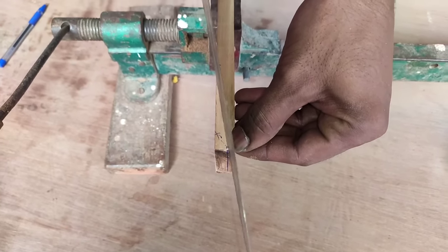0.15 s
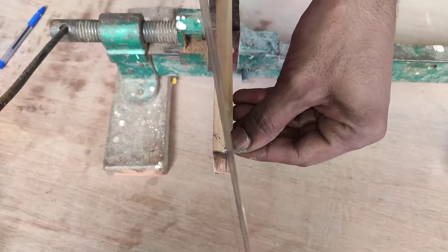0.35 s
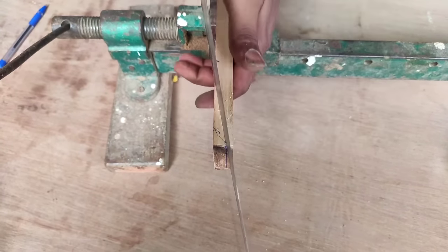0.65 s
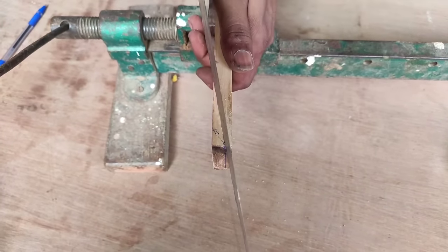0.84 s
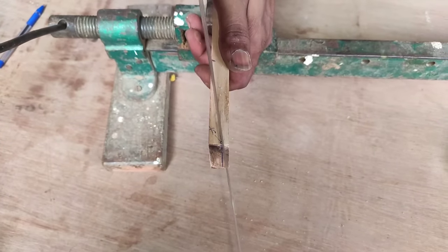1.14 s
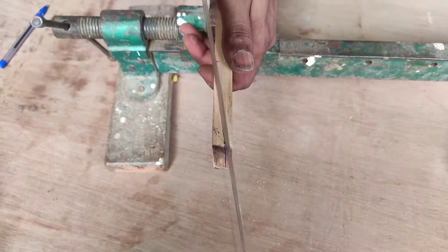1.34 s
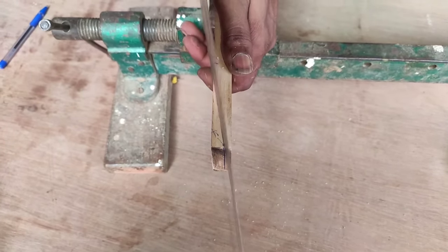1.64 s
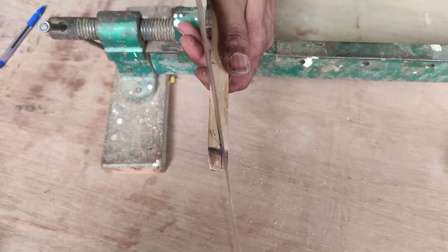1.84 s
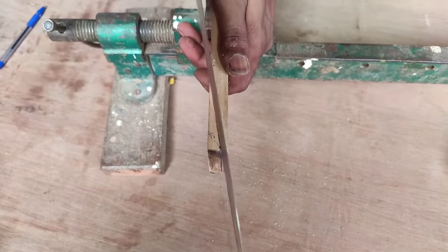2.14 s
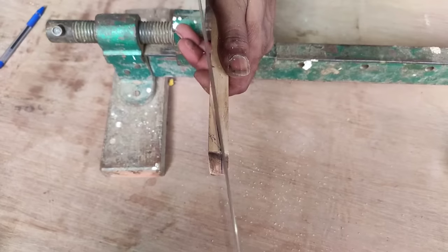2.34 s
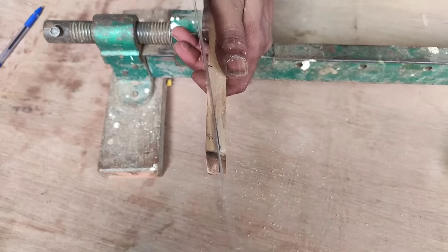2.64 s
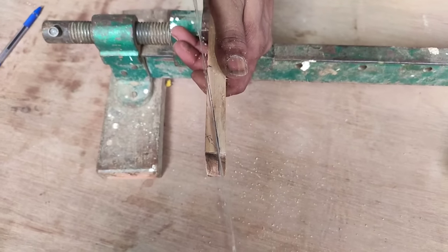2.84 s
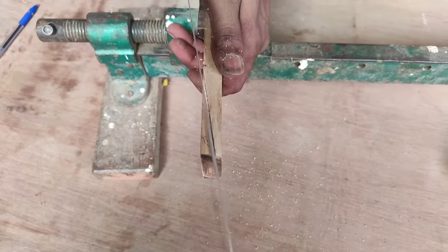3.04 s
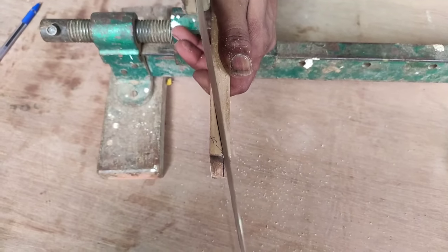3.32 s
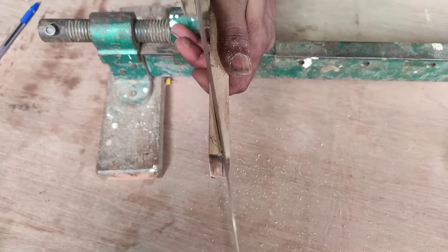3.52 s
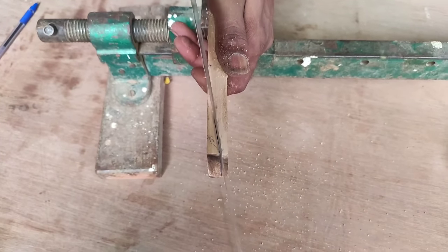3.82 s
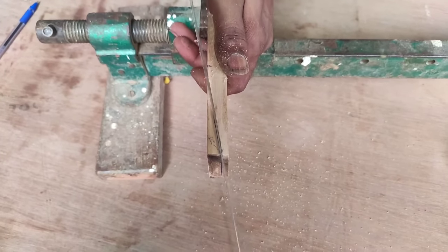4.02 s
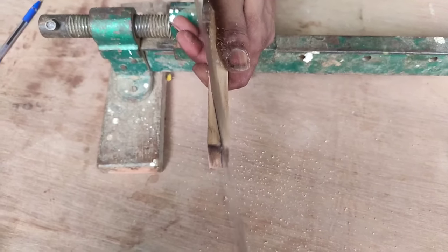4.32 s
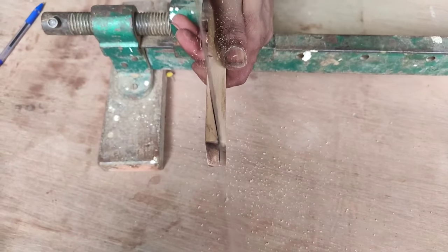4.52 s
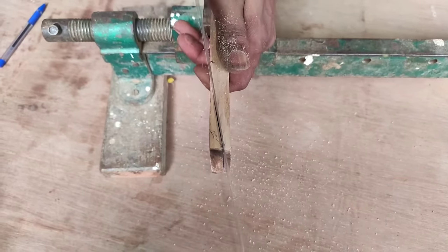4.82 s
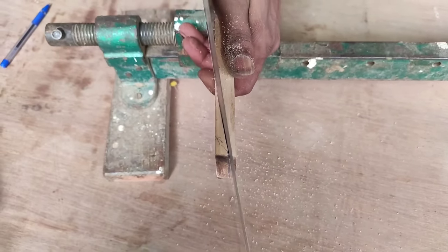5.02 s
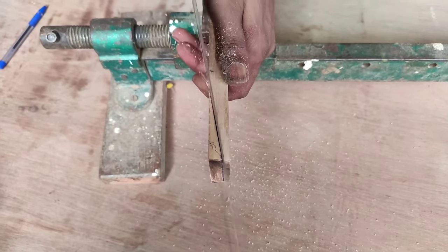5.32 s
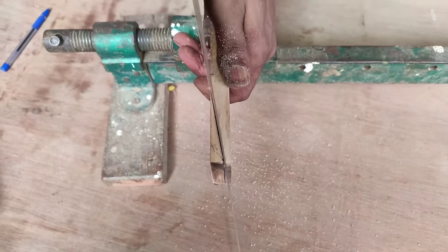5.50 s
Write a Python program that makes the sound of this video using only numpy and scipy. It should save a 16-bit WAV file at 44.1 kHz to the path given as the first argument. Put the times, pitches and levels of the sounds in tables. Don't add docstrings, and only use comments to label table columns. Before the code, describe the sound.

Light sawing on a thin wood slat, a short pause, then rapid raspy back-and-forth cutting, growing rougher with one heavy dull thump late.

```python
import sys
import numpy as np
from scipy import signal
from scipy.fft import rfft, irfft
from scipy.io import wavfile
from scipy.ndimage import uniform_filter1d

SR = 44100
rng = np.random.default_rng(int(sys.argv[2]) if len(sys.argv) > 2 else 0)


def store_wav(level_fs):
    pcm = np.round(np.clip(np.atleast_2d(level_fs), -1, 1) * 32767)
    wavfile.write(sys.argv[1], SR, pcm.T.astype(np.int16))


def level_to_linear(level):
    exponent = np.asarray(level, float) / 20
    return 10 ** exponent


N = 249606
TIME = np.arange(N) / SR

# centre_hz, width_hz, level_db
BENCH_MODES = [(63, 31, -12), (108, 34, -9), (140, 36, -1), (185, 40.9, 1), (250.6, 37.8, -2),
               (286.2, 42.6, -3), (344.3, 72.6, -9.5), (589, 73, -18.5), (756, 134, -27)]


def noise(channels):
    return rng.standard_normal((channels, N))


def unit(x):
    return x / np.sqrt(np.mean(x ** 2))


def colour(x, hz, db):
    bins = np.log(np.arange(N // 2 + 1) * SR / N + 1)
    gain = level_to_linear(np.interp(bins, np.log(hz), db))
    return irfft(rfft(x) * gain, N)


def ring(x, modes):
    out = 0
    for k, (centre_hz, width_hz, level_db) in enumerate(modes):
        b, a = signal.iirpeak(centre_hz, centre_hz / width_hz, SR)
        out = out + (-1) ** k * level_to_linear(level_db) * signal.lfilter(b, a, x)
    return out


def wander(rate_hz, channels):
    k = int(SR / rate_hz)
    held = np.repeat(rng.standard_normal((channels, N // k + 1)), k, axis=1)[:, :N]
    return unit(uniform_filter1d(uniform_filter1d(held, k), k))


def add(out, start_s, burst):
    i = int(start_s * SR)
    out[..., i:i + burst.shape[-1]] += burst[..., :N - i]


def struck(hz, t60_ms):
    t = TIME[:SR // 5]
    return np.sin(2 * np.pi * hz * t) * level_to_linear(-60 * t / (t60_ms / 1000))


def apart(x, own, share, lag):
    share = np.clip(share, 0, 1)
    return np.sqrt(1 - share) * np.array([np.roll(x, lag), x]) + np.sqrt(share) * own


def effort(part, edge_db, flat, wider):
    # full_speed_s, rise_ms, fall_ms, tear_db, bench_db, slat_db
    stroke_table = [(0.016, 10.8, 29, -55.5, -41, -69), (0.113, 34.3, 32, -49.5, -40, -68),
                    (0.22, 34, 35.2, -52, -38, -64), (0.313, 34, 40.8, -47.5, -39.5, -62),
                    (0.425, 36.3, 33.7, -49, -36.5, -65), (0.536, 53, 34, -43, -37, -67),
                    (1.137, 41.5, 33, -45, -32.5, -57.5), (1.245, 28.3, 29, -45.5, -34.5, -56),
                    (1.345, 41.2, 47, -42, -31.5, -49.5), (1.425, 20, 50, -38, -29, -45),
                    (1.536, 36.6, 24.9, -36.5, -28.5, -39), (1.636, 37, 33, -41.5, -31.5, -50),
                    (1.726, 31, 32, -34.5, -30, -40.5), (1.827, 34.1, 34.6, -38.5, -33.5, -46),
                    (1.917, 29.5, 28.8, -35.5, -30.5, -43), (2.018, 29.8, 35.7, -38, -31, -44),
                    (2.11, 33.3, 26, -32, -26, -40), (2.211, 35.2, 36.9, -40, -32.5, -46.5),
                    (2.308, 36.4, 26.9, -31.5, -25, -38), (2.405, 27.3, 34.8, -37, -32.5, -40.5),
                    (2.493, 29.2, 30, -33.5, -35, -41.5), (2.602, 26.7, 33, -38, -37, -45),
                    (2.687, 29.1, 29.9, -34, -35.5, -41), (2.792, 29, 29.5, -35.5, -35.5, -46.5),
                    (2.881, 30.2, 34.7, -32.5, -33, -40.5), (2.985, 27, 34.8, -35.5, -35, -42),
                    (3.071, 26.7, 30, -31, -33, -38.5), (3.179, 29.2, 33.7, -36, -33.5, -46.5),
                    (3.265, 27.7, 30.5, -32.5, -33.5, -41.5), (3.382, 42, 23, -35.5, -35.5, -49),
                    (3.457, 26.9, 33, -32.5, -35.5, -41), (3.568, 34, 30.6, -34.5, -33.5, -48),
                    (3.648, 26, 28, -30.5, -36.5, -38), (3.752, 24, 32.7, -34, -34.5, -42.5),
                    (3.838, 29, 32.2, -30, -30, -42), (3.94, 25, 42, -36, -30.5, -41),
                    (4.034, 29.2, 31.3, -32.5, -33, -39.5), (4.144, 28.7, 35.7, -34, -36, -43),
                    (4.232, 27.3, 30, -30, -24, -36.5), (4.346, 34.5, 31.6, -35.5, -32, -47),
                    (4.426, 25.6, 38.8, -27.5, -22, -34), (4.54, 31, 29.3, -37.5, -32.5, -51),
                    (4.625, 30.9, 24, -29, -26.5, -35), (4.736, 27.9, 27.6, -34, -30, -45.5),
                    (4.817, 24.7, 38, -31.5, -32.5, -37.5), (4.933, 29.4, 31, -33, -33.5, -39),
                    (5.015, 24.9, 22.7, -29, -29.5, -35), (5.128, 32.1, 29.9, -34, -32, -46),
                    (5.209, 28, 28.9, -30.5, -31.5, -39), (5.321, 37.7, 25.7, -34, -37.5, -42),
                    (5.395, 21.5, 32.2, -29, -28.5, -37.5), (5.506, 27.1, 31, -33, -31.5, -40.5),
                    (5.59, 25.1, 30.3, -29.5, -30.5, -38)]
    power = np.full(N, 1e-14)
    for full_speed_s, rise_ms, fall_ms, tear_db, bench_db, slat_db in stroke_table:
        level_db = {"speed": 0, "tear": tear_db, "bench": bench_db, "slat": slat_db}[part]
        i, j = max(int((full_speed_s - .12) * SR), 0), int((full_speed_s + .12) * SR)
        t = TIME[i:j] - full_speed_s
        place = np.abs(t) / np.where(t < 0, rise_ms, fall_ms) * 1000 / wider
        power[i:j] += level_to_linear(2 * (level_db + edge_db * place ** flat))
    return np.sqrt(power)


def teeth():
    full_speed_teeth_hz = 330.8
    speed = np.clip(effort("speed", edge_db=-5.0, flat=2.1, wider=1.), .2, 1.2)
    unevenness = 1 + .25 * wander(150, channels=1)[0]
    phase = np.cumsum(full_speed_teeth_hz * speed * unevenness) / SR
    bite = np.diff(np.floor(phase), prepend=0)
    size = level_to_linear(4.2 * rng.standard_normal(N)) * (1 + 0.64 * rng.standard_normal(N))
    return bite * size / np.sqrt(speed), phase % 1


def bench_shaking(shake, judder):
    push = shake * judder * effort("bench", edge_db=-6, flat=1.94, wider=1.016)
    body = ring(push, BENCH_MODES) / np.std(ring(shake[0], BENCH_MODES))
    own = colour(body[1:], [100, 300, 800], [-9, -5, 7])
    return apart(body[0], own, share=0.08, lag=4)


def slat_ringing(shake, judder):
    # centre_hz, width_hz, level_db
    slat_modes = [(1254, 70, -8), (1364, 74, 1), (1427, 74, 1), (2100, 270, -16), (3050, 130, -13)]
    push = shake * judder * effort("slat", edge_db=-4.5, flat=2.05, wider=0.96)
    tone = ring(push, slat_modes) / np.std(ring(shake[0], slat_modes))
    own = ring(noise(channels=2) * np.abs(tone[0]), slat_modes[1:3]) * 9
    ports_db = np.array([[-1], [.8]])
    return apart(tone[0], own, share=0.18, lag=5) * level_to_linear(ports_db)


def fibre_tearing(phase, judder):
    # centre_hz, left_db, right_db
    tear_spectrum = [(694, 11, 8), (990, 11.5, 4.5), (2030, 9, 8.5), (3020, 12.5, 4), (3860, 13.5, 10.5),
                     (5200, 8.5, 7), (7500, 11, 5.5), (9000, 14.5, 3), (10940, 18, 2.5), (13300, 14, 0.5),
                     (16300, 6, -7)]
    hz, *ports_db = np.transpose(tear_spectrum)
    gate = 1 + .5 * np.exp(-phase / 0.21)
    fibres = noise(channels=2) * gate * level_to_linear(1.72 * wander(400, channels=1))
    fibres = fibres * effort("tear", edge_db=-8, flat=3.36, wider=0.97) * judder ** 0.49
    tear = np.array([colour(x, [300, *hz], [-20, *db]) for x, db in zip(fibres, ports_db)])
    return tear * level_to_linear(-12.5)


def blade_rasp(judder):
    rasp = noise(channels=2) * judder * effort("bench", edge_db=-11.5, flat=2.8, wider=0.95)
    return colour(rasp, [300, 800, 2500, 5000, 9000], [-17, -5, -11, -18.5, -35]) * level_to_linear(3)


def sawing():
    bites, phase = teeth()
    shake = unit(bites) + 0.72 * noise(channels=3)
    judder = level_to_linear(2.46 * wander(45, channels=3))
    body = bench_shaking(shake, judder[0]) + slat_ringing(shake, judder[1])
    return body + fibre_tearing(phase, judder[2]) + blade_rasp(judder[0])


def knocks():
    # start_s, peak_db, ring_hz, t60_ms, push_ms
    jam_table = [(.8, -25.5, 190, 39, 2.4), (1.098, -18.5, 200, 40.4, 2.8), (1.415, -14.5, 262, 30, 1.17),
                 (1.537, -22, 200, 56, 2.6), (1.725, -21.5, 185, 95, 2.51), (2.105, -16.5, 205, 72, 2.49),
                 (2.311, -15.5, 185, 109.7, 2.5), (3.132, -23, 199.9, 90, 2.525),
                 (3.95, -16.5, 279.9, 56.4, 2.106), (4.227, -10, 124.5, 67.5, 2.6),
                 (4.24, -21, 140, 77, 1.5), (4.415, -4, 140, 90, 3.2), (4.43, -22, 154, 54, 2.5),
                 (4.694, -14.5, 132, 49.2, 2.7), (5.012, -23, 188.4, 58, 2.5),
                 (5.417, -13, 189.4, 57.8, 2.12)]
    out, pushes = np.zeros(N), np.zeros(N)
    for start_s, peak_db, ring_hz, t60_ms, push_ms in jam_table:
        push = np.hanning(int(push_ms * SR / 1000) + 2)
        push = push / push.sum()
        add(out, start_s, level_to_linear(peak_db) * np.convolve(struck(ring_hz, t60_ms), push))
        add(pushes, start_s, level_to_linear(peak_db) * push)
    out = out + level_to_linear(17) * ring(pushes, BENCH_MODES)
    return np.array([np.roll(out, 4), out])


def clinks():
    # pitch_hz, t60_ms
    steel_modes = [(4000, 37), (9150, 55), (10270, 30), (12160, 47), (12700, 55)]
    # start_s, then peak_db of each steel mode
    clink_table = [
        (.545, -60, -44, -60, -60, -52),
        (1.135, -25.5, -37, -46, -38, -31),
        (1.365, -46, -47, -52, -50, -43),
        (1.39, -48, -43, -55, -55, -50),
        (1.42, -30, -23.5, -24, -19, -34),
        (1.538, -46, -29.5, -35, -44, -34),
    ]
    out = np.zeros(N)
    for start_s, *modes_db in clink_table:
        crack = rng.standard_normal(SR // 5) * level_to_linear(-60 * TIME[:SR // 5] / 0.015 + max(modes_db))
        add(out, start_s, np.diff(crack, prepend=0))
        for (pitch_hz, t60_ms), peak_db in zip(steel_modes, modes_db):
            add(out, start_s, level_to_linear(peak_db) * struck(pitch_hz, t60_ms))
    return out


def ticks():
    # start_s, peak_db, ring_hz, t60_ms
    tick_table = [
        (.114, -39, 10500, 6),
        (.308, -38, 12000, 5.6),
        (0.547, -31, 3230, 15),
        (.857, -39, 1701, 12),
        (.94, -42.5, 2100, 19.8),
        (1.412, -22, 2151, 24.4),
        (1.414, -19, 738, 23),
        (4.231, -21, 900, 31),
        (4.447, -20.5, 2902, 19.9),
    ]
    out = np.zeros(N)
    for start_s, peak_db, ring_hz, t60_ms in tick_table:
        rough = 1 + .5 * rng.standard_normal(SR // 5)
        add(out, start_s, level_to_linear(peak_db) * struck(ring_hz, t60_ms) * rough)
    return out


def treble_left(x):
    return np.array([np.roll(x, 5), colour(x, [2000, 6000, 12000], [-1, -4, -12])])


def room_tone():
    # pitch_hz, density_db (per Hz)
    room_spectrum = [(12, -35), (20, -4.5), (126, -4), (166, -5), (393, -18), (478, -18), (581, -19.5),
                     (1410, -32.5), (2090, -29.5), (2610, -33), (4550, -38), (10500, -40.5), (15500, -48)]
    hz, db = np.transpose(room_spectrum)
    mid, *own = noise(channels=3)
    shared = colour(mid, [300, 2000], [0, -20])
    both = shared + colour(np.array(own), [30, 150, 2000], [-9, -18, 0])
    swell = level_to_linear(2.0 * wander(5, channels=1))
    tone = colour(both * swell, hz, db)
    left = colour(tone[0], [5000, 10000], [0, 3])
    right = colour(tone[1], [5000, 10000], [0, -6])
    return unit(np.array([left, right])) * level_to_linear(-43.5)


def walls(near):
    t = TIME[:SR // 3]
    tail = rng.standard_normal((2, SR // 3)) * level_to_linear(-60 * t / 0.27) * (t > .004)
    tail = tail / np.linalg.norm(tail[0])
    return signal.fftconvolve(colour(near, [200, 1000], [-12, 0]), tail, axes=1)[:, :N]


def scene():
    near = sawing() + knocks() + treble_left(clinks() + ticks())
    return near + level_to_linear(-10) * walls(near) + room_tone()


def roll_off(x):
    return signal.sosfilt(signal.butter(12, 16370, fs=SR, output="sos"), x)


def record(dry):
    thin = signal.sosfilt(signal.butter(1, 22, "high", fs=SR, output="sos"), dry)
    return roll_off(thin)


dry = scene()
out = record(dry)
store_wav(out)
```